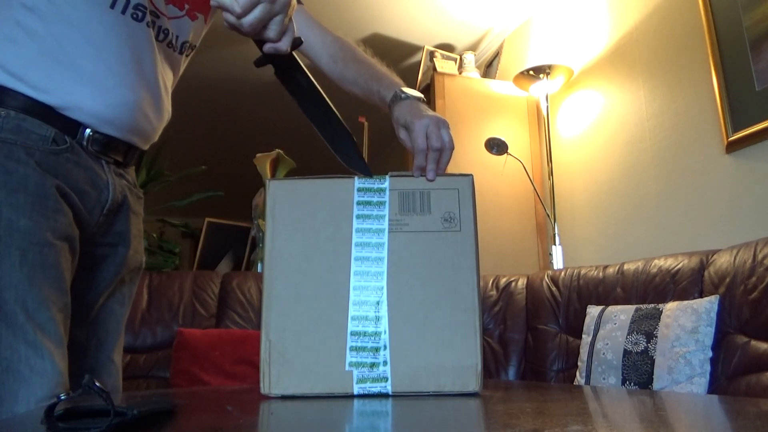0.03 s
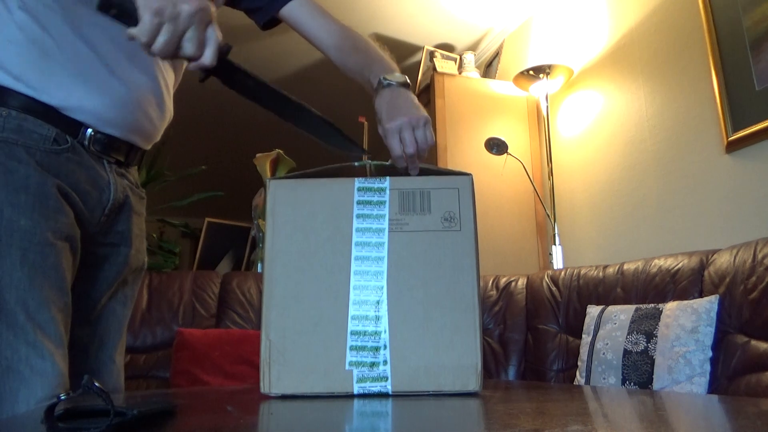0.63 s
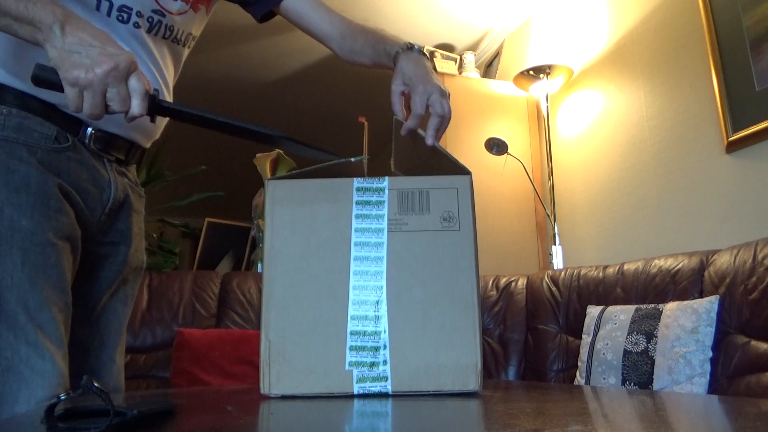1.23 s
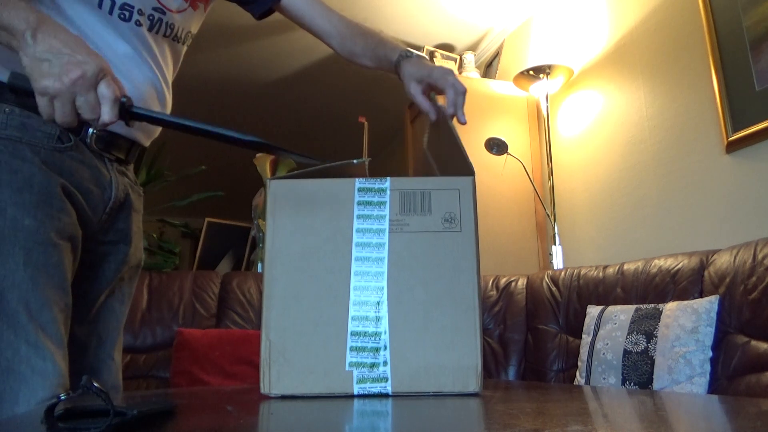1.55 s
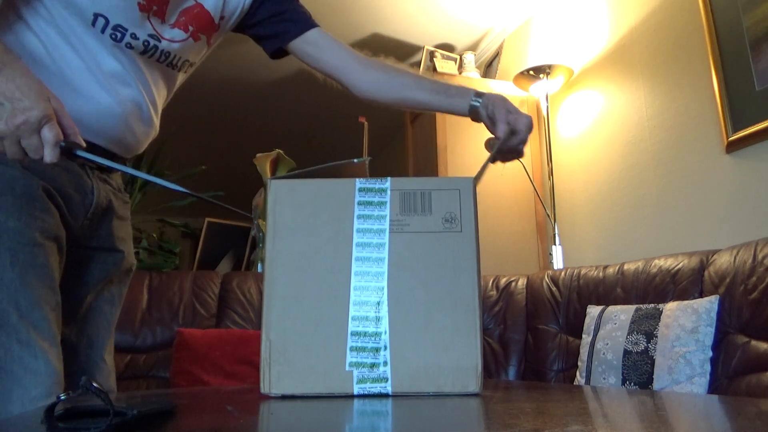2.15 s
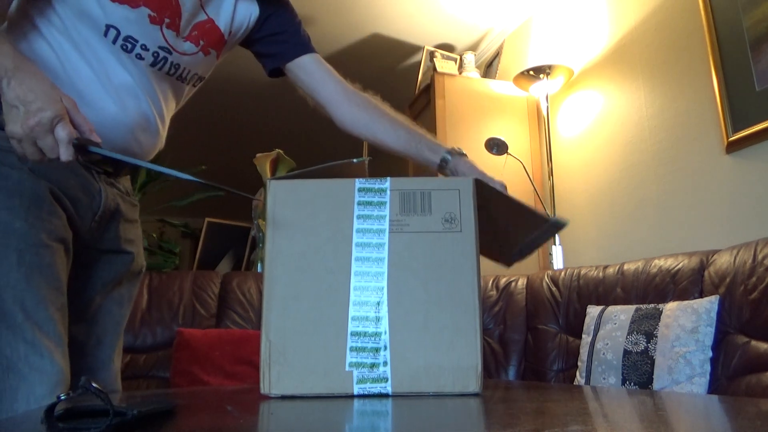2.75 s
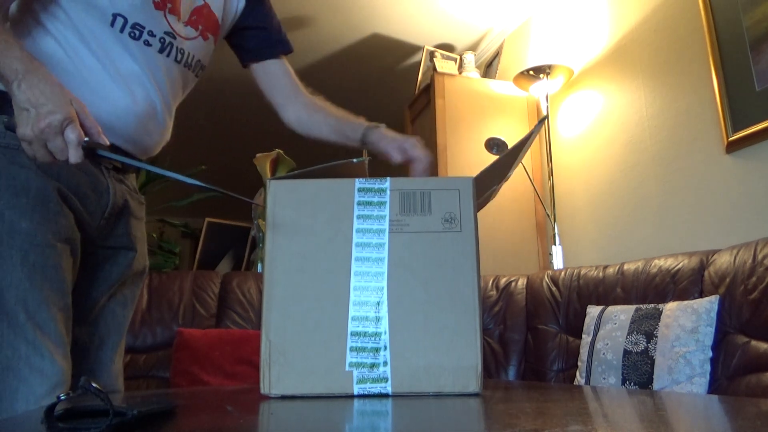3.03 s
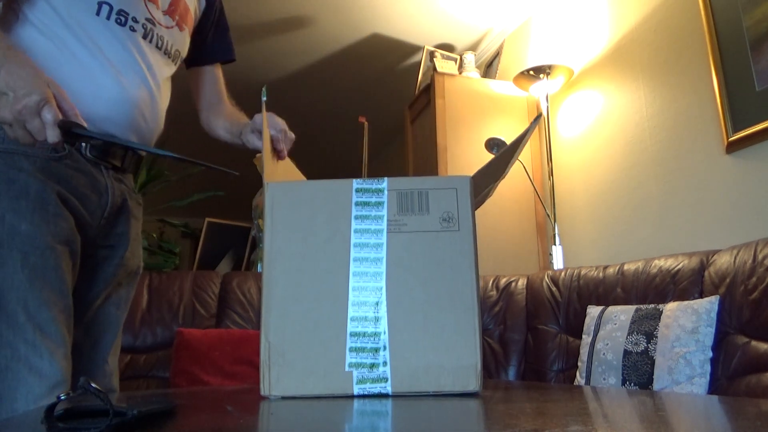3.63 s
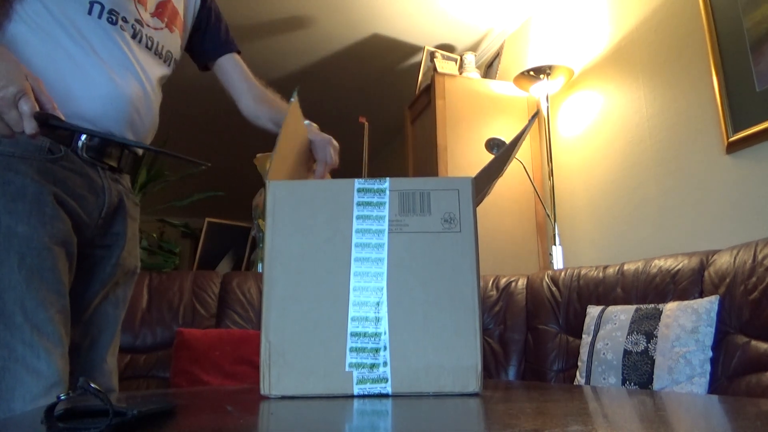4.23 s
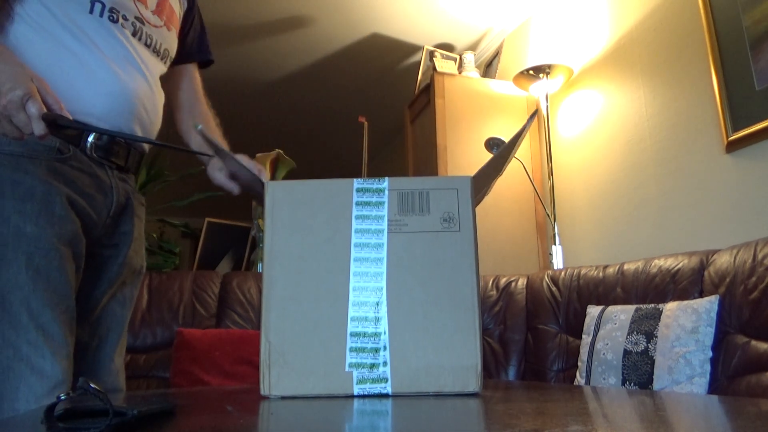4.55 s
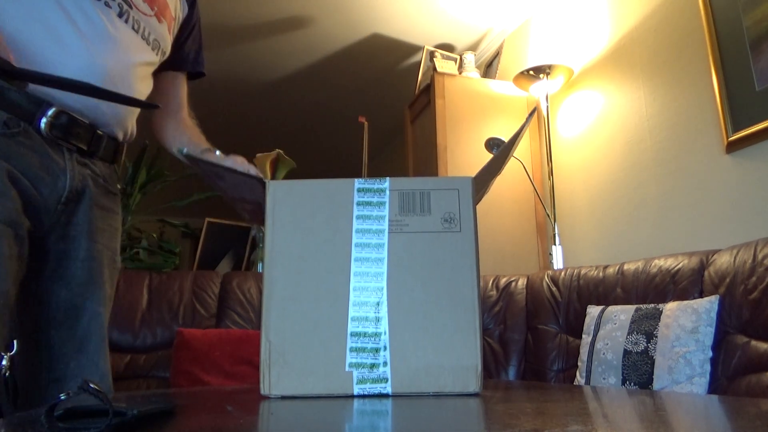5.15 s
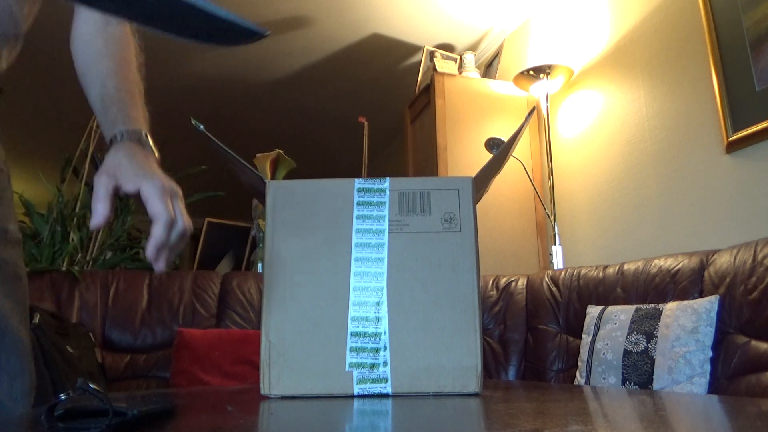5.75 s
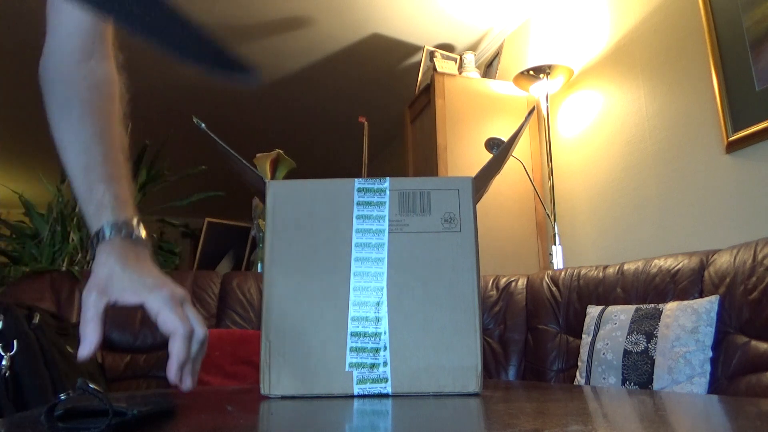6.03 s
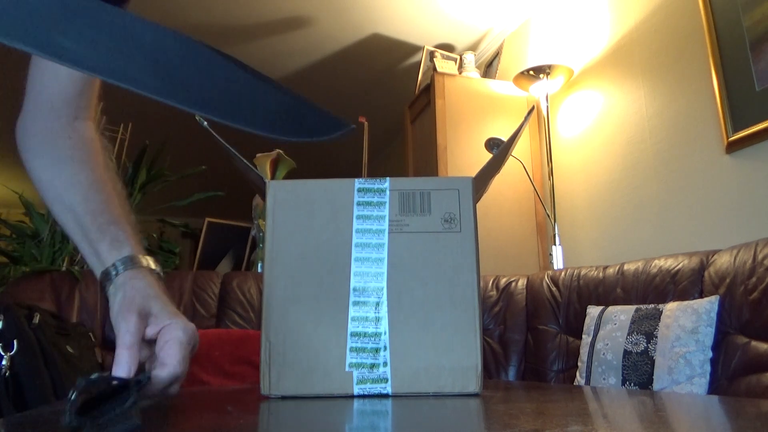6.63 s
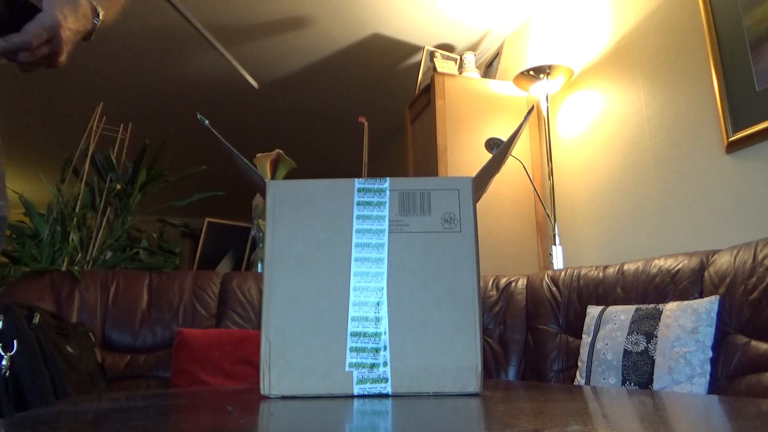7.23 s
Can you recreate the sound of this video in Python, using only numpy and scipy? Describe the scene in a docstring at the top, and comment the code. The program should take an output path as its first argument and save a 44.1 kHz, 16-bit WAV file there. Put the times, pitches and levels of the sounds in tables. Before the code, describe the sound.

A big knife saws briefly through packing tape on a cardboard box with a thin scratch. The flaps pop free with a hollow boom, then slide past each other and fold back, rasping, creaking and snapping at the creases while loose tape ticks. A sleeve brushes by, a hand bumps the table and drags a soft object off it. Stereo microphones face the table in a quiet living room.

```python
"""A thin, scratchy sawing comes first: a big knife parting the last packing tape on a cardboard box.
The flaps pop free, slide past each other and are folded back, creaking and snapping at their creases
and booming as they strike the box. Then a sleeve brushes by, and a hand bumps the table and drags
a soft object off it. Heard in a quiet living room, on a stereo pair of microphones facing the table."""
import sys
import numpy as np
from scipy import signal
from scipy.fft import rfft, irfft
from scipy.io import wavfile

SR = 44100
rng = np.random.default_rng(int(sys.argv[2]) if len(sys.argv) > 2 else 0)


def dump(signal):
    """Clip the signal to [-1, 1] and save it as 16-bit WAV at the path in sys.argv[1]."""
    limited = np.clip(np.atleast_2d(signal).T, -1, 1)
    pcm = np.round(limited * 32767).astype(np.int16)
    wavfile.write(sys.argv[1], SR, pcm)


N = 321048


def from_db(db):
    """Decibels to gain."""
    return 10 ** (np.asarray(db) / 20)


def rms_one(x):
    """Scale to unit power."""
    return x / np.sqrt(np.mean(x ** 2) + 1e-20)


def at_hz(points, hz, column=1):
    """Read a table on a log-frequency axis."""
    table = np.array(points)
    return np.interp(np.log(hz + 1e-9), np.log(table[:, 0]), table[:, column])


def add(out, s, sound):
    """Mix a sound in at s seconds."""
    start = max(round(s * SR), 0)
    out[start:start + len(sound)] += sound[:N - start]


def colour(x, spectrum, size=4096):
    """Minimum-phase filter of unit energy: only the shape of the spectrum counts."""
    gains = from_db(at_hz(spectrum, np.arange(size // 2 + 1) * SR / size))
    cepstrum = irfft(np.log(gains))
    response = irfft(np.exp(rfft(2 * cepstrum[:size // 2], size)))
    return signal.oaconvolve(x, response / np.linalg.norm(response))[:len(x)]


def drift(per_s):
    """A random curve that glides to a new value per_s times a second."""
    knots = rng.standard_normal(N // 10)
    return np.interp(np.arange(N) / SR * per_s, np.arange(len(knots)), knots)


def ring(x, hz, t60):
    """One mode: a unit click starts a fading sine of height 1."""
    radius, angle = from_db(-60 / (t60 * SR)), 2 * np.pi * hz / SR
    return signal.lfilter([0, np.sin(angle)], [1, -2 * radius * np.cos(angle), radius ** 2], x + 1e-18)


def burst(t60, size=4096):
    """A fading cluster of tiny contacts, with a flat spectrum and unit energy."""
    fading = rng.standard_normal(size) * from_db(-60 * np.arange(size) / SR / t60)
    spectrum = rfft(fading, 2 * size)
    cluster = irfft(spectrum / (np.abs(spectrum) + 1e-12))[:size]
    return cluster / np.linalg.norm(cluster)


def friction(per_s, spread_db, clump_db, clumps_per_s):
    """Fibres catch and let go: clicks of uneven size that come in clumps."""
    sizes = from_db(spread_db * np.minimum(rng.exponential(1, N), 4)) * rng.choice([-1, 1], N)
    slips = rng.random(N) < per_s / SR
    return rms_one(sizes * slips * from_db(clump_db * drift(clumps_per_s)))


def swells(rubs, drop_db=9, roundness=1.28):
    """One gain curve per level column; a rub is drop_db down at peak - rise and at peak + fall."""
    t, power = np.arange(0, N, 32) / SR, 0
    for peak_s, rise, fall, *levels_db in rubs:
        away = np.maximum((peak_s - t) / rise, (t - peak_s) / fall)
        power = power + from_db(np.array(levels_db)[:, None] - drop_db * np.abs(away) ** roundness) ** 2
    return [np.interp(np.arange(N) / SR, t, np.sqrt(column)) for column in power]


# Spectrum of the still room: f/Hz, level/dB. In all tables, levels are relative within their column.
ROOM_TONE = [(20, 10), (45, -5), (70, -11.5), (130, -6.5), (330, -11), (700, -13.5), (1500, -17.5),
             (4000, -23.5), (8000, -26), (10500, -26.5), (13000, -33), (16000, -39)]
def room_tone(level_db=-54.5, side_db=-9):
    """Steady rumble of the living room, with the hiss of the microphones."""
    mid, side = (colour(white, ROOM_TONE) for white in rng.standard_normal((2, N)))
    return from_db(level_db) * (mid + from_db(side_db) * side * [[1], [-1]])


# Reverberation of the living room: f/Hz, t60/s, tail level/dB, side share/dB
ROOM_DECAY = [(60, 0.7, -7, -59), (245, 0.33, -5, -16.5), (800, 0.33, 0.5, -7), (2020, 0.54, -3.5, -5),
              (5060, 0.38, -1.5, -8.5), (10100, 0.19, -2, -13.5), (14900, 0.087, -12, -46)]
def living_room(x, onset_s=0.0021, stretches=12, size=20000):
    """Direct sound and a tail that dies band by band; the echo paths change as hands and flaps move."""
    t, edges_hz = np.arange(size) / SR, np.geomspace(45, 17000, 13)
    build_up = 1 - np.exp(-(t / onset_s) ** 2)
    white = rng.standard_normal((2, 2, stretches, 1, size))
    tails = np.zeros((stretches, 2, size))
    for k, (low, high) in enumerate(zip(edges_hz, edges_hz[1:])):
        t60, wet_db, side_db = (at_hz(ROOM_DECAY, np.sqrt(low * high), column) for column in (1, 2, 3))
        band_pass = signal.butter(2, [low, high], "band", fs=SR, output="sos")
        band = signal.sosfilt(band_pass, white[k % 2]) * from_db(-60 * t / t60) * build_up
        mid, side = band / np.linalg.norm(band, axis=-1, keepdims=True) * np.sqrt(2 * (high - low) / SR)
        tails += from_db(wet_db) * (mid + from_db(side_db) * side * [[1], [-1]])
    out = np.array([x, x])
    for stretch, tail in zip(np.array_split(np.arange(N), stretches), tails):
        for channel, response in zip(out, tail):
            add(channel, stretch[0] / SR, signal.fftconvolve(x[stretch], response))
    return out


# Phase between the microphones: f/Hz, lead of the left/rad
PAIR_PHASE = [(0, 0), (340, 0.099), (2580, 0.59), (4650, 0), (5170, 0.4), (16400, -0.0)]
def microphone_pair(x):
    """The two microphones hear the box slightly out of step; each takes half the phase difference."""
    lead = at_hz(PAIR_PHASE, np.arange(N // 2 + 1) * SR / N)
    return irfft(rfft(x) * np.exp(0.5j * lead * [[1], [-1]]), N)


# Spectrum of clothing: f/Hz, level/dB
CLOTH = [(100, -9), (400, 1.5), (900, -1.5), (2000, -5.5), (5000, -8), (9000, -13), (16000, -22)]
# The arm swings up and down: peak t/s, rise/s, fall/s, level/dB
ARM_SWINGS = [(5.42, 0.29, .2, -61), (5.69, 0.16, 0.15, -53.5)]
def sleeve():
    """Cloth brushes faintly over cloth."""
    swing, = swells(ARM_SWINGS)
    fibres = friction(per_s=15000, spread_db=2.5, clump_db=-1, clumps_per_s=52)
    return from_db(-2.5) * swing * colour(fibres, CLOTH)


# Spectra of the scuff on the table top and of the object's rustle: f/Hz, level/dB
SCUFF = [(150, -8), (420, -3), (750, -3.5), (1100, -6), (1400, 0), (1800, -4.5), (2100, -6), (2700, -21),
         (5000, -29)]
RUSTLE = [(1180, -35), (2000, -4), (3280, -3.5), (3870, -1), (4900, -3), (5830, 1.5), (7770, 0.5),
          (9740, 4), (16000, -18)]
# Pulls on the object: peak t/s, rise/s, fall/s, scuff level/dB, rustle level/dB
PULLS = [(6.082, 0.034, 0.054, -51, -60), (6.265, 0.069, 0.023, -44, -55.5), (6.465, 0.021, .03, -59, -45),
         (6.49, 0.021, 0.016, -36.5, -44), (6.58, 0.056, .06, -48.5, -45),
         (6.655, 0.043, 0.022, -54.5, -44.5), (6.765, 0.065, 0.14, -68, -48.5),
         (7.035, 0.037, 0.05, -59, -49.5), (7.11, 0.054, 0.027, -55, -49), (7.215, 0.021, 0.069, -57, -57)]
def soft_object():
    """The object scuffs over the table and rustles as it is lifted."""
    scuff, rustle = swells(PULLS)
    catches = friction(per_s=1500, spread_db=2, clump_db=4.5, clumps_per_s=100)
    fibres = friction(per_s=24000, spread_db=5, clump_db=2.5, clumps_per_s=140)
    return from_db(-4.5) * scuff * colour(catches, SCUFF) + from_db(0.5) * rustle * colour(fibres, RUSTLE)


# Modes of the table top: f/Hz, level/dB, t60/s
TABLE_MODES = [(47.5, -12, 0.12), (75, 4.5, 0.1), (113, 3.5, 0.035), (145, -5.5, 0.069), (161, -3, 0.14)]
# Spectrum of things rattling on it: f/Hz, level/dB
CLATTER = [(80, -18.5), (200, 0), (430, 8.5), (700, 0), (1000, -31), (1600, -15), (3500, -10), (8000, -22),
           (16000, -48)]
# Bumps from the rocking box, then from the hand: t/s, thud level/dB, clatter level/dB
BUMPS = [(0.874, -67, -28), (3.193, -43, -54), (3.213, -42.5, -67), (6.055, -60, -48), (6.078, -60, -44.5),
         (6.191, -32.5, -59), (6.211, -36, -49), (6.228, -40, -43), (6.270, -39, -41), (6.291, -38.5, -60)]
def table_bumps():
    """Soft bumps ring the table top while the things on it clatter."""
    thuds, contacts = np.zeros((2, N))
    for s, thud_db, clatter_db in BUMPS:
        add(thuds, s, from_db([thud_db]))
        add(contacts, s, from_db(clatter_db) * burst(t60=0.16))
    top = sum((-1) ** k * from_db(db) * ring(thuds, hz, t60)
              for k, (hz, db, t60) in enumerate(TABLE_MODES))
    return top + from_db(27) * colour(contacts, CLATTER)


# Spectra of rasping card and of the fine hiss of card and tape: f/Hz, level/dB
RASP = [(1200, -5), (2300, -4.5), (2900, 2), (4200, 0.5), (6000, 0), (7500, -3.5), (10000, -8.5),
        (16000, -51)]
HISS = [(5000, -27.5), (7900, -14.5), (9300, -3), (10300, 0.5), (11300, -4.5), (12500, -8), (14500, -11),
        (16000, -19)]
# Loose tape coming unstuck: t/s, level/dB, film f/Hz
TAPE_TICKS = [(0.1073, -39, 9650), (0.99, -39, 10500), (1.8135, -25, 10100), (1.9442, -33.5, 8800),
              (2.0166, -32, 9500), (2.073, -36, 9100), (2.661, -34, 6200), (3.1736, -38.5, 9400),
              (4.5588, -35.5, 10100), (4.575, -35.5, 10500), (4.862, -44, 7160), (6.75, -43, 8250),
              (7.257, -40.5, 9400)]
def tape_ticks(film_t60_s=0.0026):
    """A bit of tape lets go: the film rings over a dry click, and the card beneath crackles."""
    film, clicks = np.zeros((2, N))
    for s, db, hz in TAPE_TICKS:
        click = from_db(db) * burst(t60=0.008)
        add(clicks, s, click)
        add(film, s, ring(click, hz, film_t60_s))
    crackle = from_db(-4.5) * colour(clicks, RASP)
    return from_db(12.5) * film + from_db(18.5) * colour(clicks, HISS) + crackle


# Creases creaking as the flaps bend back: t/s, f/Hz, level/dB
CREAKS = [(1.908, 2004, -43), (2.016, 1820, -48), (2.522, 1450, -38.5), (2.601, 1770, -40.5)]
def crease_creaks(slips_t60_s=0.09, card_t60_s=0.032):
    """A short run of slips in the fold sets the stiff card ringing."""
    out = np.zeros(N)
    for s, hz, db in CREAKS:
        add(out, s, from_db(db) * ring(burst(slips_t60_s), hz, card_t60_s))
    return from_db(7) * out


# Spectrum of a popping crease: f/Hz, level/dB
CREASE_POP = [(150, -4), (400, -4), (800, 2.5), (1400, 0), (1900, 0.5), (2500, -7.5), (5000, -70)]
# Snaps, mostly of creases: t/s, pop level/dB, crack level/dB, tick level/dB, crumpling time/s
SNAPS = [(0.0852, -45, -45.5, -41, 0.0029), (0.5605, -44, -43, -34, 0.0077), (0.5651, -37, -23, -31, 0.014),
         (0.5688, -34, -43, -19, 0.02), (0.58, -49, -24, -30, 0.24), (0.638, -27, -30, -20.5, 0.017),
         (0.869, -24, -20.5, -25, 0.0039), (0.877, -21.5, -42, -28, 0.11), (1.338, -41, -38, -38, 0.033),
         (1.9078, -50, -39, -33.5, 0.029), (2.5216, -36, -36, -50, 0.027), (2.602, -53, -29, -40, 0.016),
         (3.183, -36, -34.5, -31.5, 0.16), (4.3109, -31, -31.5, -29, 0.063), (4.4226, -28, -38, -59, 0.02),
         (4.432, -28, -32, -60, 0.07), (4.443, -26, -46, -62, 0.023), (4.4949, -34.5, -38.5, -39.5, 0.0081),
         (4.5929, -36.5, -31, -41, 0.034), (6.2864, -52, -43, -54, 0.022)]
def crease_snaps():
    """Creases give way: the card pops, its fibres crack as they crumple and the tape ticks."""
    pops, cracks, tape = np.zeros((3, N))
    for s, pop_db, crack_db, tick_db, crumple_s in SNAPS:
        add(pops, s, from_db(pop_db) * burst(t60=2 * crumple_s))
        add(cracks, s, from_db(crack_db) * burst(t60=crumple_s))
        add(tape, s, from_db(tick_db) * burst(t60=0.005))
    card = colour(pops, CREASE_POP) + colour(cracks, RASP)
    return from_db(22) * card + from_db(20.5) * colour(tape, HISS)


# Air cavity and panels of the box: f/Hz, level/dB, t60/s
BOX_MODES = [(195, -12, 0.12), (265, 5, 0.067), (324, -1, 0.07), (412, -24, 0.049), (537, -5, 0.028),
             (596, -7, 0.034), (755.6, -3, 0.052), (790.4, -7, 0.048), (916, -12.5, 0.056),
             (1130, -4.5, 0.072), (1314, -7.5, 0.058), (1430, -33, 0.033), (1397, 1, 0.029),
             (1880, -12, 0.017), (2040, -14, 0.029), (2010, -34.5, 0.044), (2810, -1.5, 0.041)]
# Broad response of cardboard: f/Hz, level/dB
CARDBOARD = [(60, -22), (170, 1.5), (280, 5.5), (430, 2), (560, -1), (780, 3.5), (1100, -4.5), (1500, -1.5),
             (1850, -2), (2300, -13), (3500, -32.5)]
def box_body(rubbing, modes_db=-42):
    """Rubbing sounds through the card and, very faintly, the modes of the box."""
    modes = sum((-1) ** k * from_db(db) * ring(rubbing, hz, t60) / np.sqrt(hz)
                for k, (hz, db, t60) in enumerate(BOX_MODES))
    return rms_one(rms_one(colour(rubbing, CARDBOARD)) + from_db(modes_db) * rms_one(modes))


# Pushes of a flap: peak t/s, rise/s, fall/s, body level/dB, rasp level/dB, hiss level/dB
PUSHES = [(0.68, .045, 0.14, -47, -51.5, -42.5), (0.85, .06, 0.19, -48.5, -46.5, -44),
          (1.07, 0.026, 0.058, -49, -52, -42.5), (1.135, 0.05, 0.053, -42.5, -51.5, -48),
          (1.385, 0.082, 0.035, -48, -56, -54.5), (1.475, 0.037, 0.092, -49.5, -55.5, -43.5),
          (1.635, 0.084, 0.12, -57.5, -51.5, -37.5), (1.73, 0.07, .06, -58, -50, -40.5),
          (1.812, 0.078, 0.052, -48, -42, -38), (1.925, 0.09, 0.022, -47.5, -61, -66),
          (2.03, .05, 0.16, -59, -59, -61), (2.24, 0.065, 0.13, -46.5, -49.5, -46),
          (2.475, 0.13, 0.14, -43.5, -49.5, -56), (2.58, 0.14, 0.074, -42.5, -46, -41.5),
          (2.835, 0.073, .07, -65, -45.5, -46.5), (2.91, 0.032, 0.023, -59, -55, -45.5),
          (3.28, 0.085, 0.061, -50, -55, -53), (3.465, 0.088, 0.075, -52.5, -51, -47.5),
          (3.67, 0.12, 0.14, -57.5, -56, -52), (3.9, 0.088, 0.16, -61, -54.5, -49.5),
          (4.0, 0.031, 0.068, -41.5, -42.5, -38), (4.30, 0.062, 0.027, -46.5, -51.5, -53),
          (4.62, 0.18, 0.11, -50.5, -51.5, -49), (4.82, .05, 0.042, -52, -53.5, -52),
          (4.94, 0.061, 0.037, -59.5, -57.5, -54.5), (5.19, 0.056, 0.042, -56.5, -59.5, -59)]
def flap_slides(ticks_per_s=2.1, tick_over_hiss_db=32):
    """Card slides on card: coarse slips shake the panels, finer ones rasp and hiss, stray tape ticks."""
    body, rasp, hiss = swells(PUSHES)
    coarse = friction(per_s=800, spread_db=-0.5, clump_db=3, clumps_per_s=70)
    fine = friction(per_s=9000, spread_db=3.5, clump_db=2.2, clumps_per_s=280)
    finest = friction(per_s=9900, spread_db=2, clump_db=2.5, clumps_per_s=140)
    stray_ticks = from_db(tick_over_hiss_db) * (rng.random(N) < ticks_per_s / SR)
    return (from_db(-1.5) * body * box_body(coarse)
            + from_db(-0.5) * rasp * colour(fine, RASP)
            + from_db(-1.5) * hiss * colour(finest + stray_ticks, HISS))


# Flaps striking the box: t/s, pitch ratio, boom level/dB, panel level/dB, slap level/dB
BLOWS = [(0.571, 1.0, -37, -9, -31), (0.581, .99, -26, -21, -38), (0.649, 1.1, -38, -27, -34.5),
         (0.869, 1.42, -23, -34, -28.5), (0.8785, 0.99, -11.5, -8.5, -40), (0.903, 0.99, -40, -22, -37),
         (1.339, 0.92, -41.5, -33.5, -37.5), (2.018, 1.3, -44, -47, -52), (3.183, 0.75, -32, -32.5, -38.5),
         (3.196, 0.98, -38.5, -42, -43.5), (4.014, 0.92, -56, -22, -36), (4.423, 1.25, -30, -19, -28.5),
         (4.431, .97, -32, -32, -25), (4.601, 0.9, -50, -60, -45), (4.823, 0.81, -44.5, -67, -56),
         (5.188, 0.89, -42, -49, -50.5)]
def flap_blows(size=8192):
    """The box booms, its panels ring and the edge slaps; pitch follows how the flaps are held."""
    rings, slaps = np.zeros((2, N))
    t = np.arange(size) / SR
    for s, ratio, boom_db, panel_db, slap_db in BLOWS:
        for k, (hz, db, t60) in enumerate(BOX_MODES):
            strength_db = boom_db if hz < 450 else panel_db if hz < 1000 else slap_db
            envelope = from_db(strength_db + db - 60 * t / t60)
            add(rings, s, (-1) ** k * envelope * np.sin(2 * np.pi * hz * ratio * t))
        add(slaps, s, from_db((panel_db + slap_db) / 2) * burst(t60=0.072))
    return from_db(-1.5) * rings + from_db(21.5) * colour(slaps, CARDBOARD)


# Spectrum of ripping tape: f/Hz, level/dB
RIP_SPECTRUM = [(300, -15.5), (700, -13), (1100, 7), (1800, -4), (4000, -2), (7500, -7.5), (9500, 9),
                (10800, 8), (12000, 5.5), (14000, 6), (16000, -17)]
# Stick-slip rips: t/s, length/s, slip rate/Hz, level/dB
RIPS = [(0.025, 0.0099, 1400, -53), (0.138, 0.0085, 2300, -46), (0.167, 0.0054, 3800, -44.5),
        (0.351, 0.027, 1900, -42), (4.0106, 0.009, 1400, -33), (4.017, 0.013, 1920, -28)]
def tape_rips(jitter=0.12, spread_db=2):
    """Short runs of nearly regular slips as an edge drags over tape."""
    slips = np.zeros(N)
    for s, length, per_s, db in RIPS:
        gaps, sizes = rng.standard_normal((2, 128))
        times = np.cumsum(np.exp(jitter * gaps)) / per_s
        live = times < length
        strength = from_db(db + spread_db * sizes[live]) * np.sqrt(SR / per_s)
        np.add.at(slips, ((s + times[live]) * SR).astype(int), strength)
    return from_db(2) * colour(slips, RIP_SPECTRUM)


# Spectra of the tape being cut and of the lid while still taped down: f/Hz, level/dB
TAPE_CUT = [(1500, -2.5), (2600, -10.5), (3800, -1), (4600, -8.5), (7500, -6.5), (9500, 0), (11000, 7.5),
            (11900, 10.5), (12700, -3), (14000, 3.5), (16000, -8)]
TAUT_LID = [(70, 0), (200, -6.5), (420, 4.5), (600, -5.5), (900, -5.5), (1200, -12), (1800, -24),
            (3000, -14)]
# Modes of the steel blade: f/Hz, level/dB, t60/s
BLADE_MODES = [(3700, -18, 0.013), (6270, -8, 0.022), (9000, -1, .012), (10300, -4, .02), (12800, 1, 0.015),
               (13900, -2, .015)]
# Sawing strokes, and tugs on the lid where the blade snags: peak t/s, level/dB
SAW_STROKES = [(0.02, -52.5), (0.095, -49), (0.16, -58), (0.239, -44), (0.328, -44.5), (0.405, -40.5)]
TUGS = [(0.11, -43.5), (0.29, -48.5), (0.368, -37.5), (0.475, -45)]
# The edge dragging on under the strokes: peak t/s, rise/s, fall/s, level/dB
SAW_DRAG = (0.56, 0.44, 0.22, -46.5)
def knife(stroke_rise_fall_s=(0.029, 0.035), tug_rise_fall_s=(0.032, 0.058), blade_out_s=0.46):
    """The edge parts the film in tiny tears, which ring the blade and shake the lid."""
    sawing, = swells([(s, *stroke_rise_fall_s, db) for s, db in SAW_STROKES] + [SAW_DRAG])
    since_out_s = np.maximum(np.arange(N) / SR - blade_out_s, 0)
    sawing *= from_db(-300 * since_out_s)  # the hiss dies once the edge leaves the film
    tugging, = swells([(s, *tug_rise_fall_s, db) for s, db in TUGS])
    tears = friction(per_s=9000, spread_db=4.5, clump_db=5.5, clumps_per_s=120)
    steel = rms_one(sum(from_db(db) * ring(tears, hz, t60) for hz, db, t60 in BLADE_MODES))
    cut = colour(tears, TAPE_CUT) + from_db(-11) * steel
    return from_db(-1.5) * sawing * cut + from_db(-5.5) * tugging * colour(tears, TAUT_LID)


def scene(pan_db=0.02):
    """Everything happens at the table, at one distance from the pair and a hair right of centre."""
    box = (knife() + tape_rips() + flap_slides() + crease_snaps()
           + tape_ticks() + crease_creaks() + flap_blows())
    at_table = box + table_bumps() + sleeve() + soft_object()
    return microphone_pair(living_room(at_table)) * from_db([[-pan_db], [pan_db]]) + room_tone()


def record(dry, low_cut_hz=35, high_cut_hz=16000):
    """The microphones lose the deepest bass, and the top is cut steeply."""
    low_cut = signal.butter(2, low_cut_hz, "high", fs=SR, output="sos")
    high_cut = signal.ellip(12, 0.1, 80, high_cut_hz, fs=SR, output="sos")
    return signal.sosfilt(high_cut, signal.sosfilt(low_cut, dry))


dry = scene()
out = record(dry)
dump(out)
```